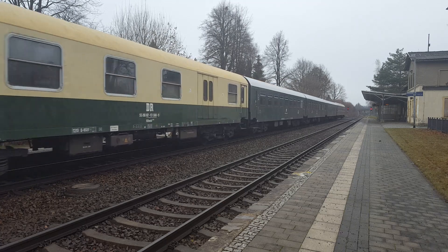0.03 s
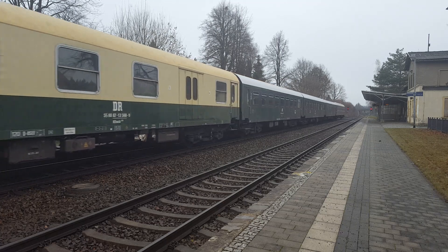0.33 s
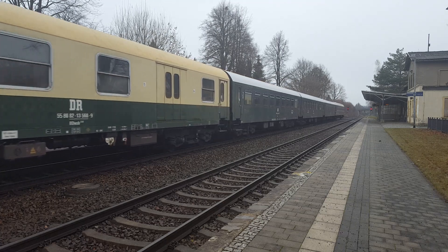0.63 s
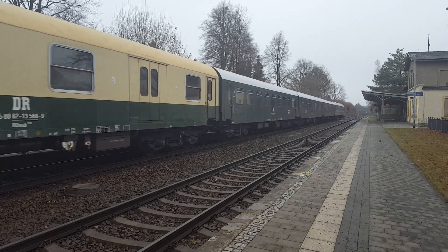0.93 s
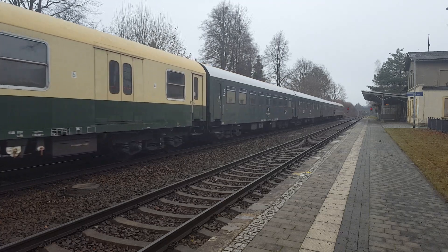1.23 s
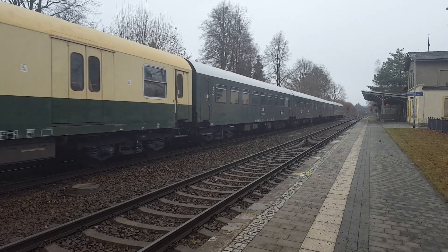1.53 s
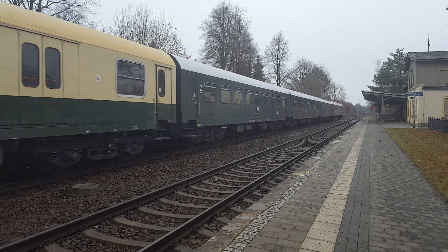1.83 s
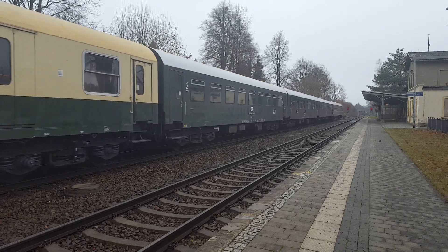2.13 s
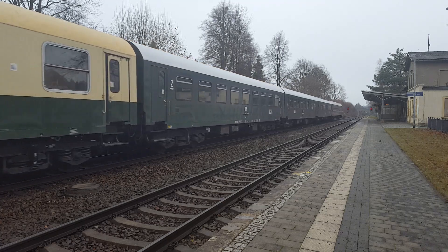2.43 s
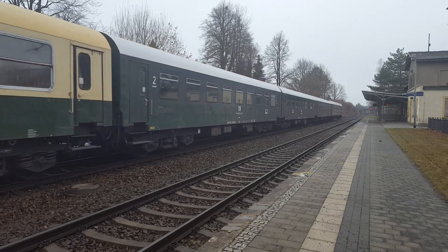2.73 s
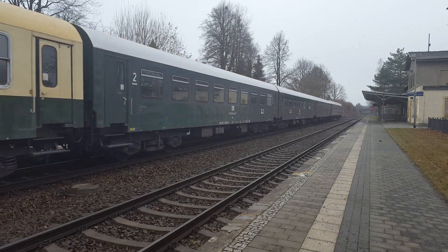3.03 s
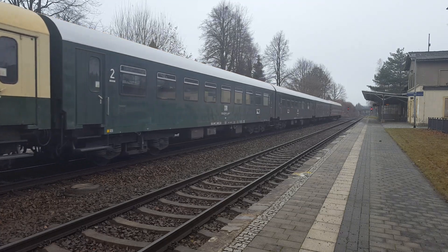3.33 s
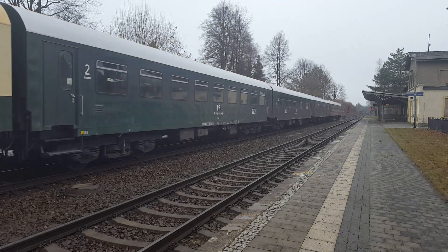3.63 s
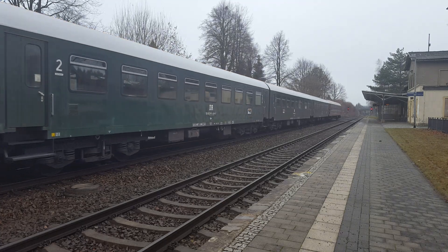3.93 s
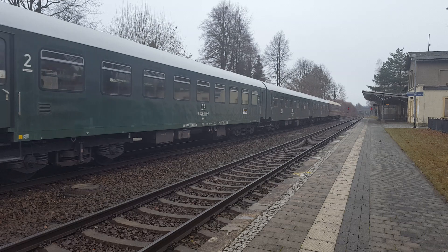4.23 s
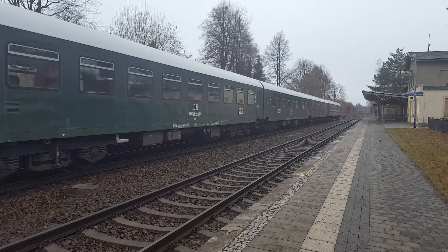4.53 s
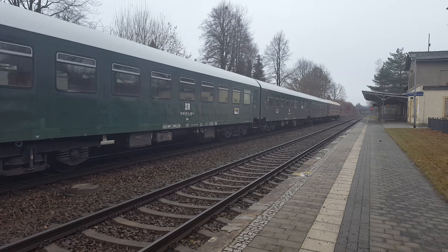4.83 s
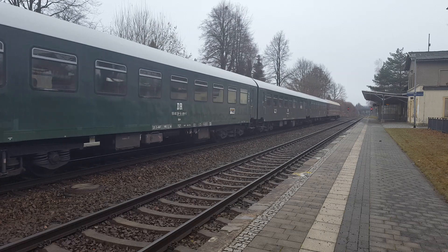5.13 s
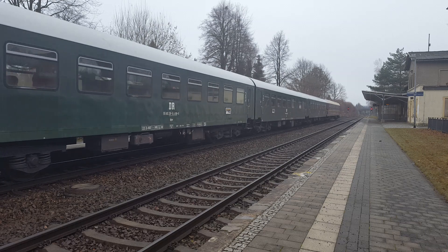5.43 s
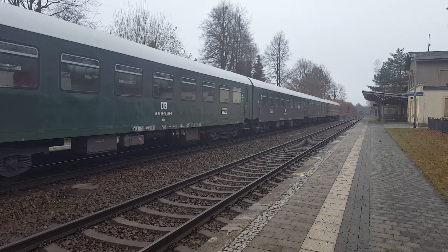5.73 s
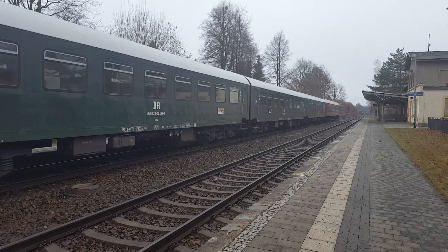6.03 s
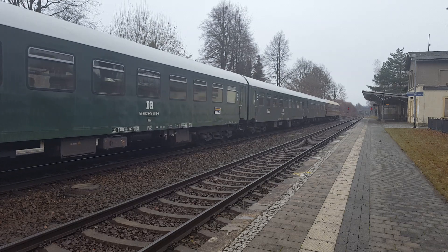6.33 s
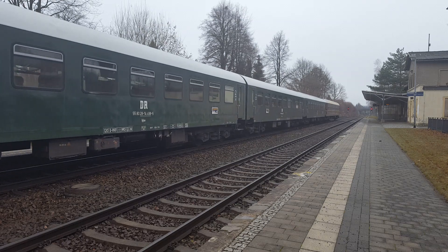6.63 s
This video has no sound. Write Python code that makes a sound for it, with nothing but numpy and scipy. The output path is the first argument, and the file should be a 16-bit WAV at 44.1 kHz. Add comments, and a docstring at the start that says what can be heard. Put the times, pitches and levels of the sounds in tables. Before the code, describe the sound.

From an outdoor station platform, a slowing train is heard rolling past with a piercing, pulsing wheel squeal. Beneath it, the brakes rasp in brief grabs and the wheels rumble along the track. Past the middle, a very thin whistling tone grows and other high squeals come and go. Toward the end the main squeal weakens, leaving a cluster of small creaks and the rolling noise.

```python
"""A high, beating squeal from passenger coaches braking slowly into a country station, heard on the platform.
Several braked wheels sing on nearly the same note and beat, ever more slowly as the speed drops;
higher wheel modes join in. Under them the running gear creaks, the brake blocks grind on the treads,
and the wheels rumble on the rails."""
import sys
import numpy as np
from scipy import signal
from scipy.io import wavfile
from scipy.ndimage import uniform_filter1d, minimum_filter1d

SR = 44100
rng = np.random.default_rng(int(sys.argv[2]) if len(sys.argv) > 2 else 0)


def unload_wav(signal):
    """Save mono or channel-first audio to the path in sys.argv[1] as 16-bit WAV at rate SR, clipped to [-1, 1]."""
    wavfile.write(
        sys.argv[1],
        SR,
        np.round(np.clip(np.atleast_2d(signal).T, -1, 1) * 32767).astype(np.int16),
    )


N = 295470
TIME = np.arange(N) / SR
STOP_S = 8.0   # even braking would reach standstill here

# squeal of all wheels together: time_s, level_db, left_minus_right_db
SQUEAL_LEVEL = [(0, -11, 3), (.2, -14.5, 0), (1.0, -12, 3.5), (1.7, -12, 1.5), (2.35, -12.5, 2),
                (2.7, -14, -1), (3.75, -11.5, -0.5), (4.2, -11.5, 5), (4.58, -8, .5), (4.72, -13.5, 1),
                (4.87, -8.5, -3.5), (5.03, -20, 9.5), (5.15, -10.5, 3), (5.5, -13.5, -0.5), (5.8, -7.5, 1),
                (6.08, -16.5, 3), (6.43, -16, 3), (6.64, -32, 1)]
# leading wheel, sharpening slightly as it slows: time_s, pitch_hz
SQUEAL_NOTE = [(0, 4274), (3.2, 4271), (4.6, 4283), (6.7, 4287)]


def main_squeal():
    """Braked wheels beat on one loud note, over a skirt of friction noise that fades as they steady."""
    level_db, pan_db = in_time(SQUEAL_LEVEL)
    pitch_hz, = in_time(SQUEAL_NOTE)
    jitter_hz, spread_hz = with_speed(1.4, 33.01), with_speed(5, 24)
    note = beating_wheels(pitch_hz, jitter_hz, spread_hz, others_db=-5.5, steadiness=4.5, scatter_rad=.9)
    fading = from_db([drift(10), drift(10)])   # shifting reflections at each ear
    unrest = jitter_hz / jitter_hz.max()
    skirt = from_db(-6) * unrest * resonance(4279, width_hz=84)
    return from_db(level_db) * (panned(pan_db) * fading * note + panned(1.2) * skirt)


# thin top squeal: time_s, relative_db
TOP_LEVEL = [(0, -37), (2.6, -41), (3.4, -37.5), (4.3, -23.5), (5.15, -26.5), (6.7, -24.5)]
# its wheel mode: time_s, pitch_hz
TOP_NOTE = [(0, 12860), (3.3, 12830), (4.2, 12785), (6.7, 12778)]


def top_squeal():
    """The wheels beat on a much higher mode, which grows as the train slows."""
    level_db, = in_time(TOP_LEVEL)
    pitch_hz, = in_time(TOP_NOTE)
    jitter_hz, spread_hz = with_speed(8.18, 77.5), with_speed(12, 48)
    note = beating_wheels(pitch_hz, jitter_hz, spread_hz, others_db=9, steadiness=1.6, scatter_rad=1.2)
    flutter_db = 1.7 * drift(24)
    return from_db(level_db + 3 + flutter_db) * panned(4.4) * note


# wheel modes that sing for a while: pitch_hz, jitter_hz, [(peak_s, rise_s, fall_s, level_db), ...]
WHEEL_MODES = [ (3187, 19, [(5.35, 0.42, 0.47, -39.5), (5.63, 0.13, 0.062, -34), (6.1, 0.36, .35, -48.5)]),
               (4035, 9.2, [(6.2, .8, 0.53, -57)]), (4512, 24, [(4.2, 1.4, 1.8, -48)]),
               (4720, 19, [(.72, .15, .18, -37), (1.32, .22, 0.18, -37), (1.78, 0.23, 1.2, -46)]),
               (5450, 35, [(0.54, .14, .2, -44)]), (6396, 37, [(4.57, 0.12, 0.16, -38.5),
               (5.65, 0.76, 0.64, -40.5), (6.14, 0.14, 0.14, -32.5), (6.65, .6, 0.27, -47.5)]),
               (7540, 32, [(5.35, 0.46, 1, -55)]), (8507, 12, [(.2, .9, 1.5, -41), (2.5, 2.9, 2.1, -41)]),
               (9620, 28, [(5.56, 0.53, 0.4, -34), (5.9, 0.38, 0.67, -50)]),
               (12535, 13, [(5.35, 0.23, .2, -51), (5.8, .2, 0.49, -39), (6.6, .45, 0.58, -55)]),
               (12768, 5.2, [(4.05, .7, 1, -40.5), (4.88, 0.49, 0.34, -25.5)]),
               (15365, 10, [(6.36, .12, 0.18, -61), (6.68, 0.21, .2, -31)])]


def passing_squeals():
    """Other wheel modes take hold, flutter and let go."""
    out = np.zeros((2, N))
    for pitch_hz, jitter_hz, swells in WHEEL_MODES:
        note = wheel(pitch_hz, jitter_hz, jitter_rate_hz=99, scatter_rad=1)
        flutter = from_db(2.6 * drift(99))
        level = sum(from_db(db) * swell(peak_s, rise_s, fall_s) for peak_s, rise_s, fall_s, db in swells)
        out += level * flutter * panned(2.2) * note
    return out


# running gear creaks: peak_s, length_s, pitch_hz, relative_db
GEAR_CREAKS = [(0.322, .1, 1626, -41), (2.915, .09, 2200, -39), (3.268, 0.062, 2180, -43),
               (3.748, 0.065, 1710, -37), (3.931, 0.15, 2156, -42.5), (4.775, 0.074, 2200, -45),
               (4.79, .04, 1675, -37), (4.89, 0.025, 1690, -39.5), (4.959, .05, 1720, -46),
               (5.16, 0.083, 2182, -36.5), (5.272, .16, 2160, -40), (5.526, 0.077, 1700, -40),
               (6.161, .08, 1784, -35), (6.359, 0.039, 1890, -32.5), (6.395, 0.049, 1792, -31),
               (6.466, 0.057, 1758, -31), (6.577, .09, 1623, -36.5), (6.67, 0.071, 1680, -34),
               (6.62, 0.14, 2460, -41)]


def creaks():
    """Stick-slip in the running gear: short rough notes that start quickly, sink and die away."""
    out = np.zeros((2, N))
    wobble_hz = 55 * np.array([drift(143), drift(148)])
    roughness = from_db(2.6 * drift(63))
    for peak_s, length_s, pitch_hz, db in GEAR_CREAKS:
        near = np.abs(TIME - peak_s) < 3 * length_s
        age = (TIME[near] - peak_s) / length_s
        envelope = np.where(age < 0, np.exp(-4 * age ** 2), np.exp(-1.8 * age))
        phase = 2 * np.pi * np.cumsum(pitch_hz - 30 * age + wobble_hz[:, near], axis=1) / SR
        out[:, near] += from_db(db + 8.5) * envelope * np.sin(phase)
    return out * roughness


# steady rub of the blocks, relative levels: time_s, grind_db, rasp_db, ring_db
BLOCK_RUB = [(0, -41.5, -38.5, -35), (1.5, -43.5, -38, -36), (2.8, -44.5, -38.5, -37),
             (4.0, -48.5, -43, -40.5), (4.3, -48.5, -47.5, -41), (5.7, -52, -45, -43),
             (5.92, -53, -56.5, -42), (6.08, -58, -61, -53), (6.7, -50.5, -57, -53)]
# a block grabs harder, relative levels: centre_s, length_s, grind_db, rasp_db
BLOCK_GRABS = [(0.104, 0.044, -35, -31), (0.44, 0.094, -41, -42), (0.608, .04, -37, -27),
               (0.95, .08, -43, -33), (1.15, .07, -37.5, -32), (1.313, 0.097, -40, -35),
               (1.48, .06, -44, -34), (1.717, 0.047, -41, -38), (1.865, .07, -41, -34),
               (2.075, .11, -39.5, -28.5), (2.244, 0.063, -42, -29.5), (2.46, 0.068, -45, -41),
               (2.685, .07, -38.5, -31), (2.932, 0.14, -40, -34), (3.11, 0.063, -45, -38),
               (3.45, .08, -41.5, -40), (3.713, 0.17, -41, -37.5), (3.943, 0.16, -41, -31),
               (4.942, 0.16, -44, -39), (5.206, 0.071, -39.5, -39), (5.327, .11, -44, -41),
               (5.61, 0.078, -54, -47), (6.14, 0.06, -49, -49)]
# friction hiss spectrum: frequency_hz, relative_density_db
HISS_SPECTRUM = [(1000, -6), (1400, 2.5), (1900, -7), (2500, -1), (3600, 2), (5000, -3.5), (6200, -1),
                 (7800, -3.5), (9500, -9), (10500, -13.5), (11700, -16.5), (14200, -14.5), (15500, -39)]
# hiss treble, bright at first and duller from about 4 s: time_s, top_octave_db
HISS_TREBLE = [(0, 4.5), (2.8, 1), (4.2, -12.5), (6.7, -12)]
# resonances of blocks and rigging: pitch_hz, width_hz, relative_db
RIGGING_MODES = [(1285, 71, -9.5), (2235, 130, -6.5), (3320, 70, -11.5), (3530, 70, -14.5),
                 (5450, 64, -2.5), (7200, 180, -4.5)]


def brake_blocks():
    """Iron blocks grind on the treads and now and then grab; the friction hisses and rings resonances."""
    grind_db, rasp_db, ring_db = in_time(BLOCK_RUB)
    chatter = drift(11.4)   # uneven rub
    grind_gain = from_db(grind_db + 1.25 * chatter)
    rasp_gain = from_db(rasp_db + 3.5 * chatter)
    for centre_s, length_s, grab_grind_db, grab_rasp_db in BLOCK_GRABS:
        grip = press(centre_s, length_s)
        grind_gain = np.hypot(grind_gain, from_db(grab_grind_db) * grip)
        rasp_gain = np.hypot(rasp_gain, from_db(grab_rasp_db) * grip)
    treble = from_db(in_time(HISS_TREBLE)[0])
    bands = noise_bands(HISS_SPECTRUM, flicker_db=2)
    hiss = from_db(9.5) * unit_power(sum(band * (treble if hz > 9000 else 1) for hz, band in bands))
    rigging = sum(from_db(db) * resonance(hz, width_hz) for hz, width_hz, db in RIGGING_MODES)
    ring = from_db(ring_db + 4 + 1.25 * chatter) * resonance(8576, width_hz=170)   # octave over the squeal
    rasp = rasp_gain * resonance(2918, width_hz=170)
    return panned(3.2) * (grind_gain * (hiss + rigging) + ring + rasp)


# ground and coach bodies: time_s, rumble_db, body_db
ROLL_LEVELS = [(0, -35, -35), (1.2, -33.5, -32), (1.6, -35, -36), (2.3, -32.5, -35.5), (3.5, -34.5, -36),
               (4.2, -32.5, -38.5), (4.6, -34.5, -38.5), (5.2, -40, -44.5), (5.75, -35.5, -44),
               (6.15, -34, -40), (6.7, -32.5, -35)]
# track noise, relative levels: time_s, roar_db, rails_db
TRACK_LEVELS = [(0, -37, -52), (1.2, -36, -39.5), (1.5, -38, -38.5), (2.3, -40.5, -39), (4.1, -38, -40.5),
                (4.9, -36.5, -39), (5.3, -40, -42.5), (5.6, -40.5, -39), (6.0, -37.5, -37),
                (6.7, -34.5, -28.5)]
# rolling noise spectrum: frequency_hz, relative_density_db
ROLL_SPECTRUM = [(22, -16.5), (32, -13), (48, -11), (68, 2), (90, 1.5), (130, -1), (190, -6), (290, -11),
                 (410, -8.5), (600, -10), (820, -20), (1150, -14.5), (1700, -16), (3500, -25)]
# resonances of rails and bogie frames: pitch_hz, width_hz, relative_db
TRACK_MODES = [(413.5, 56, -7.5), (558, 40, -14.5), (670, 40, -8), (798, 50, -6.5), (862, 55, -7.5),
               (1019, 80, -7.5), (1160, 90, -5.5)]


def rolling():
    """Rough treads on rough rails shake the ground and the coach bodies, and set the rails ringing."""
    rumble_db, body_db = in_time(ROLL_LEVELS)
    roar_db, rails_db = in_time(TRACK_LEVELS)
    bands = noise_bands(ROLL_SPECTRUM, flicker_db=1.5)
    rumble = unit_power(sum(band for hz, band in bands if hz < 140))
    body = unit_power(sum(band for hz, band in bands if 140 <= hz < 350))
    roar = unit_power(sum(band for hz, band in bands if hz >= 350))
    rails = sum(from_db(db) * resonance(hz, width_hz) for hz, width_hz, db in TRACK_MODES)
    bump = from_db(3 * press(centre_s=5.9, length_s=.05))   # a wheel crosses a rough spot
    track = bump * (from_db(roar_db + 4.5) * roar + from_db(rails_db + 2.5) * rails)
    return from_db(rumble_db) * rumble + from_db(body_db) * body + panned(.47) * track


def beating_wheels(pitch_hz, jitter_hz, spread_hz, others_db, steadiness, scatter_rad):
    """A steadier leading wheel beats against two rougher ones, one flat and one sharp."""
    lead = wheel(pitch_hz, jitter_hz / steadiness, jitter_rate_hz=99, scatter_rad=scatter_rad)
    others = sum(wheel(pitch_hz + offset_hz, jitter_hz, jitter_rate_hz=130, scatter_rad=1.204)
                 for offset_hz in (-spread_hz, spread_hz))
    chorus = lead + from_db(others_db) * others
    slow_power = uniform_filter1d(chorus ** 2, size=3000, axis=1)
    return chorus / np.sqrt(slow_power + 1e-9)   # evens the level, keeps quick beats


def wheel(pitch_hz, jitter_hz, jitter_rate_hz, scatter_rad):
    """One wheel self-excited on one mode; uneven friction shakes its pitch. Unit power."""
    phase = 2 * np.pi * np.cumsum(pitch_hz + jitter_hz * drift(jitter_rate_hz)) / SR
    ear_shift = scatter_rad * drift(6.38)   # moving reflections off ballast and coach side
    return np.sqrt(2) * np.sin([phase + ear_shift, phase - ear_shift])


def resonance(hz, width_hz):
    """A resonance kept ringing by random friction; stereo, unit power."""
    radius = np.exp(-np.pi * width_hz / SR)
    feedback = [1, -2 * radius * np.cos(2 * np.pi * hz / SR), radius * radius]
    ring = signal.lfilter([1, 0, -1], feedback, rng.standard_normal((2, N)))
    skirts = signal.butter(1, [hz - 2 * width_hz, hz + 2 * width_hz], "band", fs=SR, output="sos")
    return unit_power(both_ears(*signal.sosfilt(skirts, ring), hz))


def noise_bands(spectrum, flicker_db):
    """Half-octave bands of flickering stereo noise, as (centre_hz, band) pairs."""
    edges_hz = np.geomspace(20, 18000, 21)
    white = rng.standard_normal((2, 2, N))
    bands = []
    for k, (low_hz, high_hz) in enumerate(zip(edges_hz, edges_hz[1:])):
        if spectrum[0][0] < high_hz and low_hz < spectrum[-1][0]:
            centre_hz = np.sqrt(low_hz * high_hz)
            bandpass = signal.butter(3, [low_hz, high_hz], "band", fs=SR, output="sos")
            mid, side = signal.sosfilt(bandpass, white[k % 2])
            gain = from_db(at_hz(spectrum, centre_hz) + flicker_db * drift(15.5))
            bands.append((centre_hz, gain * both_ears(mid, side, centre_hz)))
    return bands


# likeness of the noise at the two ears: frequency_hz, correlation
EAR_LIKENESS = [(60, 1), (125, 1), (250, 1), (450, 0.78), (750, 0.64), (1400, 0.67), (2600, 0.15),
                (6000, 0.033)]


def both_ears(mid, side, hz):
    """Mix two unrelated noises into a stereo pair, more alike at low pitch."""
    alike = np.clip(at_hz(EAR_LIKENESS, hz), -1, .97)
    return np.sqrt(1 + alike) * mid + np.sqrt(1 - alike) * side * [[1], [-1]]


def from_the_left(x, lag_s=.00038):
    """Noise from the left reaches the right ear later."""
    return np.array([x[0], np.pad(x[1], (round(lag_s * SR), 0))[:N]])


def panned(left_minus_right_db):
    """Left and right gains."""
    return from_db(np.array([[.5], [-.5]]) * left_minus_right_db)


def with_speed(at_rest_hz, added_at_entry_hz):
    """A jitter or spread that shrinks with the train's speed."""
    return at_rest_hz + added_at_entry_hz * np.clip(1 - TIME / STOP_S, 0, 1)


def swell(peak_s, rise_s, fall_s, depth_db=18.5):
    """Gain with a rounded peak, depth_db down at the ends of its rise and fall."""
    age_s = TIME - peak_s
    drop_db = depth_db * (age_s / np.where(age_s < 0, rise_s, fall_s)) ** 2
    return from_db(-np.minimum(drop_db, 200))


def press(centre_s, length_s, attack_s=.014, release_s=.03):
    """Gain of a brief pressure that bites, holds and lets go."""
    bite = .5 + .5 * np.tanh((TIME - centre_s + length_s / 2) / attack_s)
    release = .5 + .5 * np.tanh((centre_s + length_s / 2 - TIME) / release_s)
    return bite * release


def drift(rate_hz, hop=20):
    """Smooth random wander with unit spread."""
    pole = np.exp(-2 * np.pi * hop * rate_hz / SR)
    white = rng.standard_normal(N // hop + 4002)
    slow = signal.lfilter([1], [1, -2 * pole, pole * pole], white)[4000:]   # once the filter has settled
    return np.interp(np.arange(N) / hop, np.arange(len(slow)), unit_power(slow))


def in_time(rows):
    """Each value column of a time table at every sample."""
    times_s, *columns = np.transpose(rows)
    return [np.interp(TIME, times_s, column) for column in columns]


def at_hz(spectrum, hz):
    """Read a spectrum on a log-frequency axis."""
    points_hz, values = np.transpose(spectrum)
    return np.interp(np.log(hz), np.log(points_hz), values)


def from_db(db):
    """Decibels to gain."""
    return 10 ** (np.asarray(db) / 20)


def unit_power(x):
    """Scale to an RMS of one."""
    return x / np.sqrt(np.mean(x ** 2) + 1e-20)


def scene():
    """Everything the train sends to the platform."""
    squeals = main_squeal() + top_squeal() + passing_squeals()
    return squeals + creaks() + from_the_left(brake_blocks() + rolling())


def record(dry, ceiling=.85, cutoff_hz=15770):
    """A smooth limiter holds the loudest beats down; the top is cut steeply."""
    headroom = np.minimum(1, ceiling / (np.abs(dry).max(axis=0) + 1e-9))
    gain = uniform_filter1d(minimum_filter1d(headroom, size=300), size=300)
    lowpass = signal.ellip(12, .1, 90, cutoff_hz, fs=SR, output="sos")
    return signal.sosfilt(lowpass, gain * dry)


dry = scene()
out = record(dry)
unload_wav(out)
```